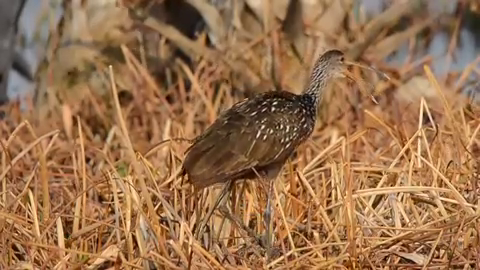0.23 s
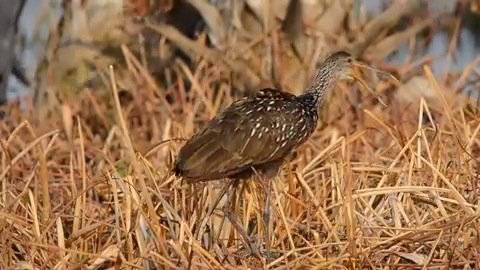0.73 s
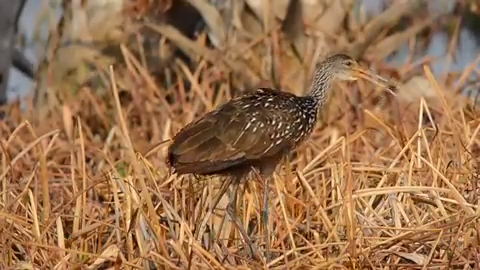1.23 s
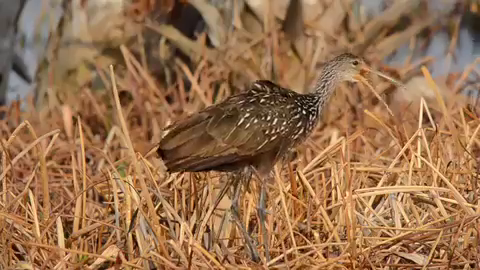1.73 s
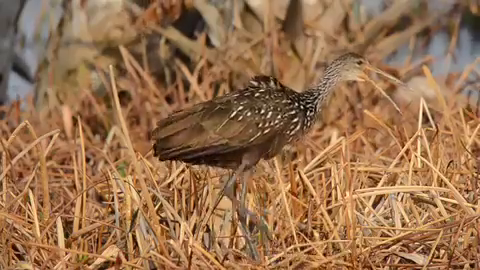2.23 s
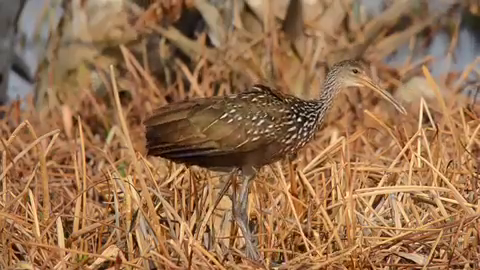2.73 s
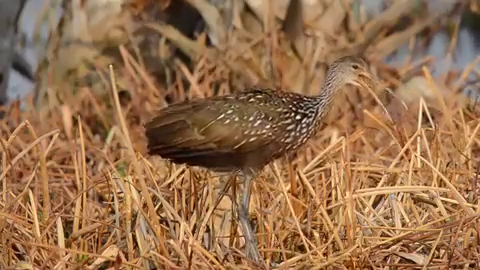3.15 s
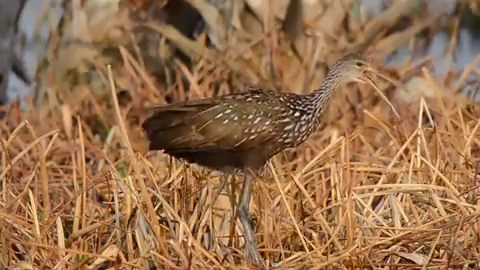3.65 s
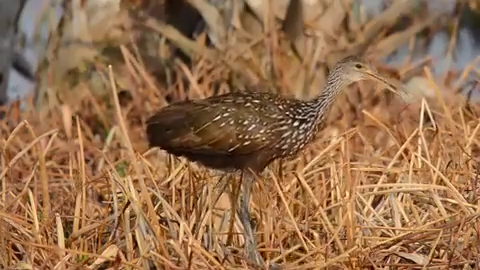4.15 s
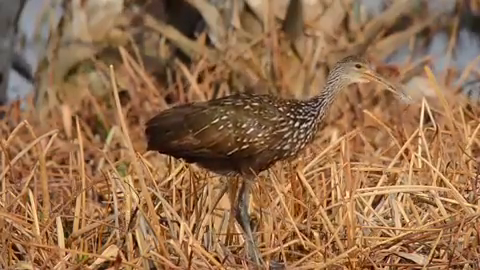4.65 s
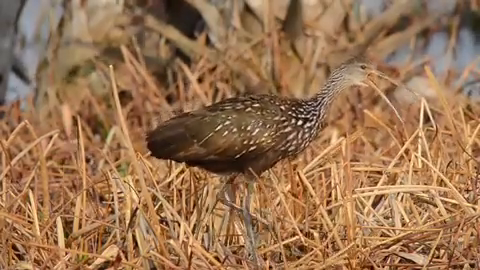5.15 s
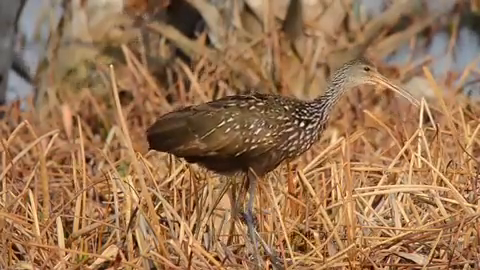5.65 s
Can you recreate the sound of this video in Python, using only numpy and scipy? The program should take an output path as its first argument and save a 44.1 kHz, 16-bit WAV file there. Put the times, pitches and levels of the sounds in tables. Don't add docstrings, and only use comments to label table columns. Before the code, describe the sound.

Outdoors in a quiet wetland, a wading bird close to the microphone screams four times, well spaced. Each clear, piercing cry climbs, peaks, then drops in two steps and fades into clucks. The third and fourth break into hiccups and yelps. A faint nasal marsh hen answers far off; a cricket trills continuously over soft hum.

```python
import sys
import numpy as np
from scipy import signal
from scipy.fft import rfft, irfft
from scipy.io import wavfile
from scipy.ndimage import uniform_filter1d

SR = 44100
rng = np.random.default_rng(int(sys.argv[2]) if len(sys.argv) > 2 else 0)


def to_wav(sig):
    pcm = np.clip(np.atleast_2d(sig), -1, 1) * 32767
    pcm = np.round(pcm).astype(np.int16)
    wavfile.write(sys.argv[1], SR, pcm.T)


def ratio(d):
    e = np.asarray(d, float) / 20
    return 10 ** e


N = 259308
TIME = np.arange(N) / SR

OVERTONES = [0.5, 6, -9, -14.5, -15.5, -22, -22.5, -26, -26, -28]
# pitch_hz, level_db
WINDPIPE = [(900, -46), (1050, -39), (1200, -33), (1380, -18), (1520, -23), (1750, -39.5), (1900, -32.5),
            (2300, -55.5), (2600, -43.5), (2950, -31), (3150, -38), (3400, -32.5), (3750, -36.5),
            (4000, -38)]
# pitch_hz,
# level_db
TREBLE = [(4300, -31), (4700, -31.5), (5200, -34), (5700, -53), (5950, -46.5), (6300, -48.5), (6700, -48),
          (7500, -44), (9000, -46), (11000, -59), (13000, -66.5), (15000, -88), (20000, -120)]
# top_s, first_jump_s, second_jump_s, end_s, sag_hz_per_s (slow fall after the second jump)
CRIES = [
    (.485, .559, .644, .80, 670),
    (1.96, 2.046, 2.115, 2.318, 770),
    (3.51, 3.608, 3.734, 4.036, 700),
    (5.19, 5.295, 5.404, 5.64, 820),
]
# time_s, pitch_hz
CLIMBS = [
    [(.372, 1500), (.399, 1626), (.41, 1732), (.426, 1784), (.457, 1844)],
    [(1.822, 1300), (1.847, 1442), (1.852, 1534), (1.881, 1732), (1.906, 1808), (1.931, 1846)],
    [(3.31, 1270), (3.361, 1386), (3.37, 1524), (3.392, 1596), (3.412, 1706), (3.442, 1758)],
    [],
]
# top_db, first_jump_db, second_jump_db, swell_db, end_db
EFFORT = [(1, 0.0082, 2.5, 4.7, -3.5), (2, 0, 0, 3.6, -1.5), (1, 0, 0, 2.1, -3.5), (-13, 0, -1, 3.2, -0.5)]
# top_db, first_jump_db, second_jump_db, end_db
BRIGHT = [(1.5, 2.9, -.5, 0.4), (3, 4.7, 1.5, 0.44), (5.5, 6.5, 3, 2.9), (6, 6.3, 2.5, 2.3)]
# drop_hz, length_s
DROOP = [(60, .01), (60, .006), (95, .016), (95, .018)]
# cry_number, start_s, end_s
BREATHS = [(0, .372, .80), (1, 1.822, 2.318), (2, 3.31, 3.442), (2, 3.559, 4.036), (3, 5.237, 5.64)]
ONSET_DB = [-3, -14, -10, 1.5, 9.5]
# start_s, effort_db, bright_db (per octave)
HICCUPS = [(3.443, 0, 7), (3.528, -0.5, 6.5), (5.142, -5, 4), (5.195, -3.5, 7.5)]
# start_s, end_s, first_pitch_hz, last_pitch_hz, effort_db
YELPS = [(3.494, 3.529, 1879, 1806, 1.5), (5.112, 5.143, 1683, 1717, 1.5), (5.179, 5.198, 1832, 1825, 0)]
# start_s, peak_db, lowest_resonance_hz, upper_resonances_db
CLUCKS = [(0.3294, -31, 1380, -6.5), (0.376, -20.5, 1474, -9.5), (0.7846, -32.5, 1285, 7),
          (0.8276, -20.5, 1437, -5.5), (0.904, -23, 1412, -3), (0.998, -24, 1380, -5.5),
          (1.074, -29, 1290, -8.5), (1.773, -32, 1370, -2.5), (1.8207, -20, 1400, -1),
          (2.3188, -31.5, 1140, 7.5), (2.3706, -22, 1410, -2), (2.4324, -22, 1350, -6),
          (2.498, -26, 1313, -6), (2.568, -31.5, 1120, -11), (3.2812, -26.5, 1410, -5),
          (3.3112, -21, 1340, -2), (3.443, -29.5, 1440, 0), (3.529, -29, 1480, 1),
          (4.0383, -23, 1330, -3.5), (4.0888, -24, 1290, -5), (4.1455, -28, 1150, -8.5),
          (5.141, -26, 1470, -3), (5.195, -27.5, 1490, -1.5), (5.645, -20, 1316, -6),
          (5.7017, -23, 1250, -7), (5.761, -34, 1020, -8)]
# time_s, flaps_hz, level_db, upper_resonances_db
RATTLE = [(4.986, 164, -30.5, -6), (5.01, 190, -18.5, -6.5), (5.03, 207, -26.5, 9), (5.07, 200, -28.5, 9),
          (5.078, 260, -19.5, -1.5), (5.086, 160, -30, -12)]
# pitch_hz, width_hz, level_db
CLUCK_BEAK = [(2120, 1040, -9), (2885, 430, -5), (3490, 550, -4.5), (4310, 450, -10.5), (4876, 180, -20.5),
              (6200, 1000, -19.5), (8160, 870, -16.5), (9800, 2200, -26)]
# pitch_hz, width_hz, level_db
WIDE_BEAK = [(2340, 360, -11.5), (2830, 300, -4), (3300, 580, 1.5), (4150, 330, -2), (4900, 400, -8),
             (6700, 1200, -22), (8350, 990, -10), (9700, 1200, -28)]
# pitch_hz, level_db
HEN_THROAT = [(300, 0), (450, -9), (700, -13), (1100, 2.5), (1400, -7.5), (1750, 2), (2250, -15.5),
              (2700, -16.5), (3300, -17), (4000, -29), (6000, -30)]
# start_s, level_db, lowest_pitch_hz, length_s, last_pitch_hz
HEN_CALLS = [(1.75, -46, 475.5, 0.18, 584), (2.284, -46.5, 480, 0.26, 717), (2.786, -45, 450, .23, 671),
             (3.297, -44.5, 432, .185, 606), (3.806, -44.5, 430, 0.21, 610)]
# start_s, length_s, first_pitch_hz, last_pitch_hz, level_db
HEN_HUMS = [(.47, .35, 396, 503, -49), (1.29, 0.2, 566, 579.5, -62), (2.25, 0.024, 900, 887, -46),
            (2.97, .09, 719, 715, -52.5)]
# start_s, length_s, first_pitch_hz, last_pitch_hz, level_db
HEN_BARKS = [(1.178, 0.067, 565, 603, -45), (1.425, 0.016, 587, 610, -52), (1.495, .017, 610, 580, -52)]
# share_of_stroke, pitch_hz, level_db
STROKE = [(0, 8100, -37), (.04, 7750, 0), (.3, 8450, 2), (0.548, 8095, 1), (0.621, 7860, -8.5),
          (.88, 7270, -13.5), (1, 7200, -27)]
# start_s, peak_db, pitch_hz
TICKS = [(0.151, -39, 891), (0.175, -29.5, 1410), (0.193, -41, 886), (0.21, -35, 1250), (0.242, -32, 1250),
         (1.69, -47, 713), (2.709, -38, 870), (3.08, -45, 659), (3.127, -55, 1175)]
# start_s, peak_db, pitch_hz
THUMPS = [(4.245, -49, 44.6), (4.291, -50, 60.3), (4.776, -46.5, 70), (4.795, -47, 79.3)]
# pitch_hz, level_db (per Hz)
MARSH = [(20, -8), (50, 0), (200, 2), (600, 3.5), (1200, 3), (2000, -3), (3000, -8), (4500, -15),
         (5400, -19), (5750, -28), (6300, -21), (8000, -8), (10000, -20), (15500, -40)]


def read(table, hz):
    table_hz, table_db = np.transpose(table)
    return np.interp(np.log(hz), np.log(table_hz), table_db)


def play(rows, fade_s):
    s, *columns = np.transpose(rows)
    span = slice(int(s[0] * SR), int(s[-1] * SR))
    t = TIME[span]
    gate = np.clip(np.minimum(t - s[0], s[-1] - t) / fade_s, 0, 1)
    return span, [np.interp(t, s, c) for c in columns], gate


def walk(rate_hz, size=N):
    hold = int(SR / rate_hz)
    steps = np.repeat(rng.standard_normal(size // hold + 1), hold)
    return 1.3 * uniform_filter1d(uniform_filter1d(steps, hold), hold)[:size]


def ring(x, hz, width):
    pole = np.exp((2j * np.pi * hz - np.pi * width) / SR)
    return signal.lfilter([1], [1, -pole], x).imag


def soft_ring(x, hz, width):
    return ring(ring(x, hz, width), hz, width) * 2 * np.e * np.pi * width / SR


def scream():
    out = np.zeros(N)
    for (k, start, end), onset_db in zip(BREATHS, ONSET_DB):
        span, _, gate = play([(start,), (end,)], 0.0012)
        t = TIME[span]
        hz, effort_db, bright_db = cry(k, t)
        onset = onset_db * np.exp((start - t) / 0.021)
        release = 2 * np.exp((t - end) / 0.011)
        unsteady_s = 0.028 if start < CRIES[k][0] else 0.007
        out[span] += sing(span, hz, effort_db + onset + release, bright_db, gate, unsteady_s)
    notes = []
    bright_db, choke_s, choke_hz, choke_db = 6.5, 0.0049, 180, 5
    for s, end, hz, last_hz, db in YELPS:
        choke = (end, last_hz - choke_hz, db + choke_db, bright_db)
        notes.append([(s, hz, db, bright_db), (end - choke_s, last_hz, db, bright_db), choke])
    for s, db, tilt in HICCUPS:
        notes.append([(s, 1520, db, tilt), (s + 0.0056, 1460, db, tilt), (s + 0.0083, 1760, db + 2.5, tilt)])
    for rows in notes:
        span, controls, gate = play(rows, 0.0007)
        out[span] += sing(span, *controls, gate, 0.007)
    return out


def cry(k, t):
    top, first, second, end, sag = CRIES[k]
    top_hz, high_end_hz, middle_hz, middle_end_hz, low_hz = 1858, 1672, 1552, 1415, 1326
    fall_hz = top_hz - high_end_hz
    first_jump_s, second_jump_s = 0.015, 0.009
    path = CLIMBS[k] + [(top, top_hz), (first, top_hz),
                        (first + first_jump_s, middle_hz + fall_hz),
                        (second - second_jump_s / 2, middle_end_hz + fall_hz),
                        (second + second_jump_s / 2, low_hz + fall_hz)]
    hz = np.interp(t, *np.transpose(path))
    hz = hz - fall_hz * np.clip((t - top) / (first - top), 0, 1) ** 2
    drop_hz, drop_s = DROOP[k]
    hz = hz - sag * np.maximum(t - second, 0) - drop_hz * np.exp((t - end) / drop_s)
    effort_db = np.interp(t, [top, first, second, second + 0.037, end], EFFORT[k])
    return hz, effort_db, np.interp(t, [top, first, second, end], BRIGHT[k])


def sing(span, hz, effort_db, bright_db, gate, unsteady_s):
    hz, effort_db, bright_db = uniform_filter1d([hz, effort_db, bright_db], size=180)
    start = np.exp(-(TIME[span] - TIME[span.start]) / unsteady_s)
    hz = hz * (1 - 0.0188 * start + (0.0013 + 0.023 * start) * walk(300, size=len(hz)))
    phase = 2 * np.pi * np.cumsum(hz) / SR
    out = 0
    for k, db in enumerate(OVERTONES, 1):
        flutter_db = (0.48 + 0.7 * k) * walk(110, size=len(hz))
        hoarse = 1 + min(k, 4) * (0.012 + 0.22 * start) * walk(900, size=len(hz))
        level_db = effort_db + db + bright_db * np.log2(k) + read(WINDPIPE + TREBLE, k * hz) + flutter_db
        out = out + hoarse * ratio(uniform_filter1d(level_db, size=90)) * np.sin(k * phase + k * k)
    return np.sqrt(2) * gate * out


def clucks():
    out = np.zeros(N + SR)
    t = np.arange(SR // 16) / SR
    for s, db, hz, upper_db in CLUCKS:
        fade = np.exp(-t / (0.023 * ratio(db + 21)))
        clicks = flaps(np.full(len(t), 200), 0.2) * (t < 0.016) * fade
        modes = np.array(CLUCK_BEAK) + [0, 0, 2.5] * rng.standard_normal((len(CLUCK_BEAK), 1))
        shift = 1 + 0.03 * rng.standard_normal()
        i = int(s * SR)
        out[i:i + len(t)] += ratio(db) * throat(clicks, hz, upper_db, modes, shift, 0.07)
    span, (rate, db, upper_db), _ = play(RATTLE, 0.001)
    opening = np.linspace(0, 1, len(rate))
    clicks = flaps(rate, 0.01) * ratio(db)
    room = (0, SR // 20)
    for share, shift in ((1 - opening, 0.92), (opening, 1.05)):
        part = np.pad(clicks * share, room)
        sound = throat(part, 1403, np.pad(upper_db, room), WIDE_BEAK, shift, 0.025)
        out[span.start:span.start + len(part)] += sound
    return out[:N]


def flaps(rate, jitter):
    turns = np.floor(np.cumsum(rate * (1 + jitter * walk(150, size=len(rate)))) / SR)
    clicks = np.diff(turns, prepend=-1)
    return clicks * ratio(0.53 * rng.standard_normal(len(rate)))


def throat(clicks, low_hz, upper_db, modes, shift, rasp_share):
    rasp = signal.lfilter([1], [1, -0.993], clicks) * rng.standard_normal(len(clicks)) * rasp_share
    push = clicks + rasp
    body = soft_ring(push, low_hz, 203) + 0.088 * soft_ring(clicks, 1050, 320)
    for k, (hz, width, db) in enumerate(modes):
        body = body + (-1) ** k * ratio(db) * soft_ring(push * ratio(upper_db), hz * shift, width)
    no_bass = signal.butter(2, 800, "high", fs=SR, output="sos")
    return signal.sosfilt(no_bass, body) + 0.013 * soft_ring(clicks, 212, 60)


def hen():
    out = np.zeros(N)
    for rows in hen_notes():
        span, (hz, db, chop), gate = play(rows, 0.0027)
        size = len(hz)
        wobble = (0.0073 + 0.013 * chop) * walk(151.3, size=size)
        phase = 2 * np.pi * np.cumsum(hz * (1 + wobble)) / SR
        beat = 0.5 + 0.5 * np.cos(2 * np.pi * 62 * (TIME[span] - rows[0][0]))
        flutter = 1 - np.clip(chop, 0, 1) * beat
        voice = 0
        for k in range(1, 9):
            level = ratio(read(HEN_THROAT, k * hz) + 2.03 * walk(56.8, size=size))
            hoarse = 1 + 1.15 * (0.17 + chop) * walk(700, size=size)
            voice = voice + level * hoarse * np.sin(k * phase)
        out[span] += np.sqrt(2) * gate * flutter * ratio(db) * voice
    return out


def hen_notes():
    notes = []
    start_hz, fade_db, hum_chop, bark_chop = 608.6, -9, 0.34, 0.93
    for s, db, low_hz, length, last_hz in HEN_CALLS:
        notes.append([(s, start_hz, db - 5, 0.5),
                      (s + 0.018, start_hz, db + 3, bark_chop),
                      (s + 0.068, low_hz, db - 2, 0.15),
                      (s + 0.75 * length, 1.18 * low_hz, db + fade_db, 0.1),
                      (s + length, last_hz, db + fade_db, 0.05)])
    for table, chop in ((HEN_HUMS, hum_chop), (HEN_BARKS, bark_chop)):
        for s, length, hz, last_hz, db in table:
            notes.append([(s, hz, db, chop), (s + length, last_hz, db, chop)])
    return notes


def bank(x):
    t = TIME[:SR // 2]
    tail = ratio(-43.5) * np.exp(-np.log(1000) * t / 0.35) * (t > 0.004)
    slap = ratio(-41) * np.exp(-0.5 * ((t - 0.04) / 0.0014) ** 2)
    echo = signal.lfilter([0.7], [1, -0.3], rng.standard_normal(len(t)) * (tail + slap))
    return signal.fftconvolve(x, echo)[:N]


def cricket():
    share, hz, db = np.transpose(STROKE)
    strokes_hz = 51.75
    turn = ((TIME - 0.0046) * strokes_hz + 0.02 * walk(1.5) + 0.006 * walk(40)) % 1
    pitch_hz = np.interp(turn, share, hz) * (1 + 0.0052 * walk(320))
    level_db = np.interp(turn, share, db) + 1.3 * walk(300) + 0.28 * walk(0.91)
    tone = ratio(level_db) * np.sin(2 * np.pi * np.cumsum(pitch_hz) / SR)
    t = TIME[:SR // 20]
    stems = ratio(-28) * rng.standard_normal(len(t)) * np.exp(-t / 0.006)
    stems[0] = 1
    return ratio(-47.5) * signal.fftconvolve(tone, stems)[:N]


def rustle():
    treble = signal.butter(2, [2500, 11000], "band", fs=SR, output="sos")
    hiss = signal.sosfilt(treble, rng.standard_normal(N))
    return ratio(-59.5 + 2 * walk(39)) * hiss * np.interp(TIME, [0, 0.25, 0.6], [1, 0.7, 0])


def ticks_and_knocks():
    out = np.zeros(N)
    for s, db, hz in TICKS + THUMPS:
        click = ratio(db) * (TIME[:SR // 10] == 0)
        i = int(s * SR)
        out[i:i + len(click)] += soft_ring(click, hz, hz)
    return out


def marsh():
    freq = np.fft.rfftfreq(N, 1 / SR) + 1
    clicks = (rng.random(N) < 150 / SR) * ratio(0.5 + 2.2 * rng.standard_normal(N))
    crackle = soft_ring(clicks, 1240, 1400)
    crackle = crackle + 0.46 * soft_ring(np.roll(crackle, SR) * 0 + np.roll(clicks, SR), 570, 620)
    hum, swell = 0, walk(0.51)
    for hz in 20 * 2 ** np.arange(0, 10, 0.5):
        shape = np.sqrt(np.clip(1 - 2 * np.abs(np.log2(freq / hz)), 0, 1))
        noise = irfft(rfft(rng.standard_normal(N)) * shape * ratio(read(MARSH, freq)), N)
        hum = hum + noise * ratio(0.5 * swell + 1.5 * walk(9))
    return ratio(-53.5) * (hum / hum.std() + 1.06 * crackle)


def scene():
    birds = scream() + clucks() + hen()
    return (birds + bank(birds) + cricket() + rustle() + ticks_and_knocks() + marsh())[None]


def top_cut(x):
    return signal.sosfilt(signal.butter(12, 15690, fs=SR, output="sos"), x)


def record(dry):
    no_deep_bass = signal.butter(2, 45, "high", fs=SR, output="sos")
    mix = signal.sosfilt(no_deep_bass, dry)
    return top_cut(mix)


dry = scene()
out = record(dry)
to_wav(out)
```